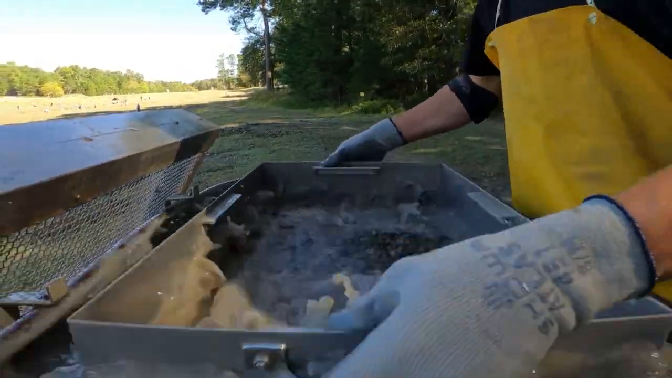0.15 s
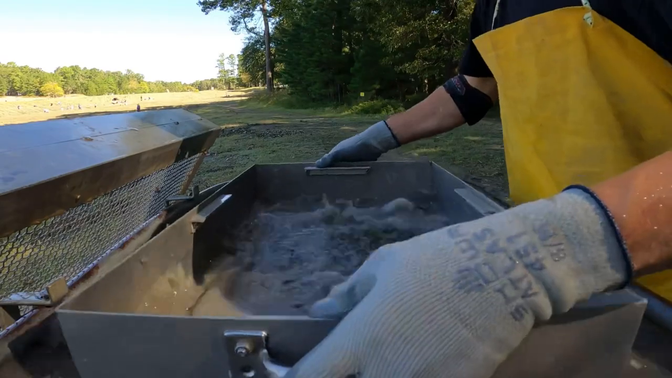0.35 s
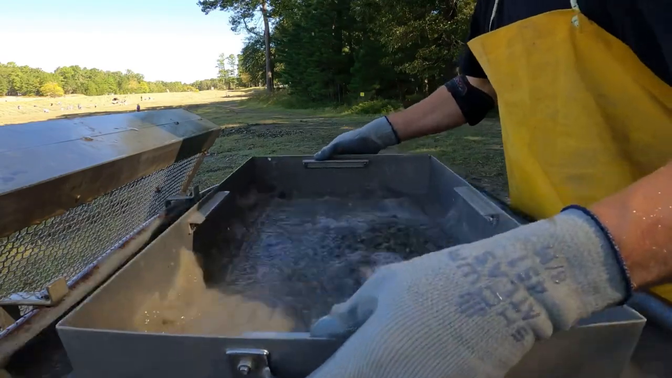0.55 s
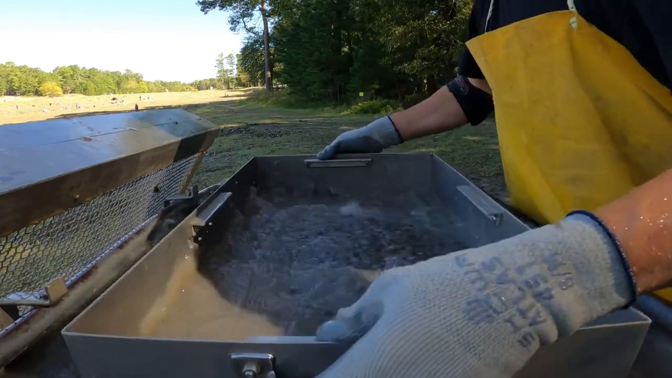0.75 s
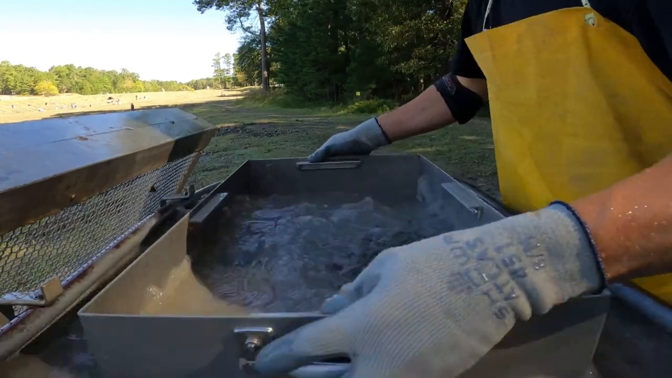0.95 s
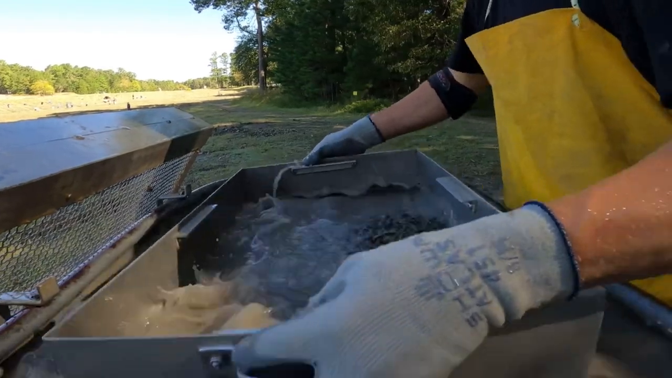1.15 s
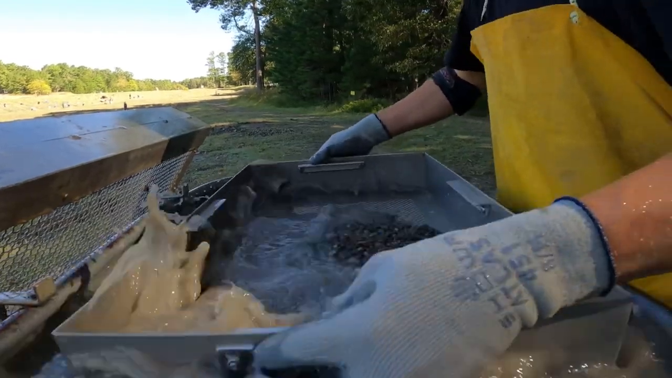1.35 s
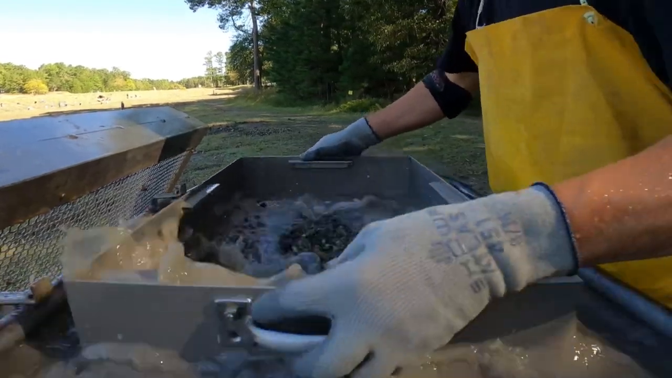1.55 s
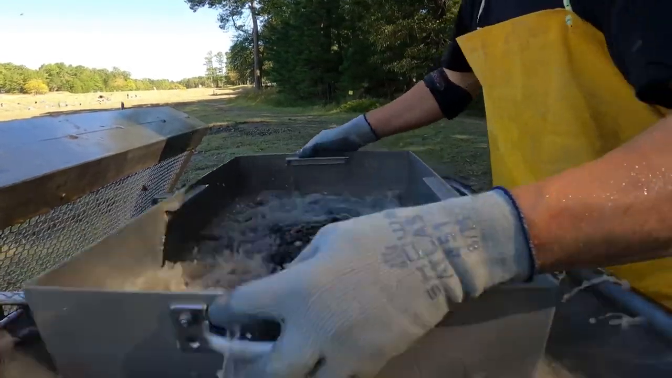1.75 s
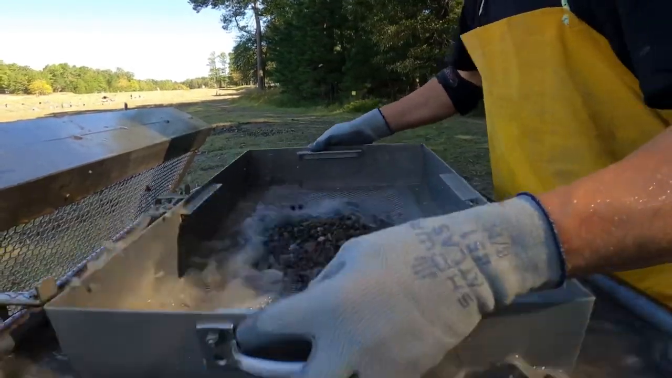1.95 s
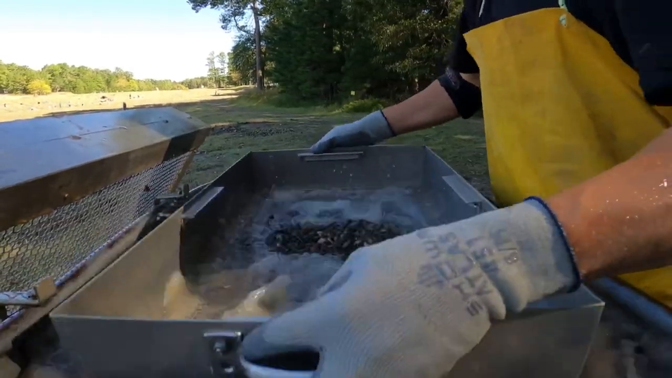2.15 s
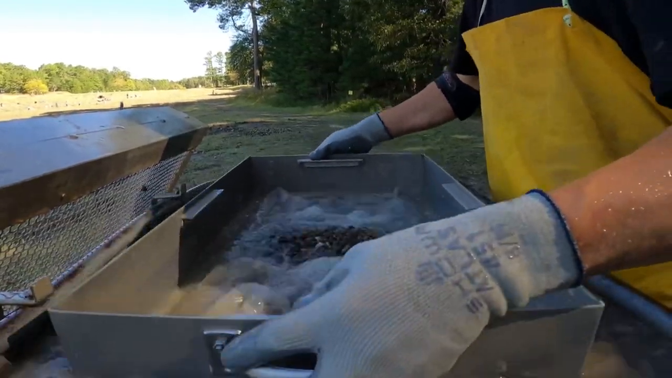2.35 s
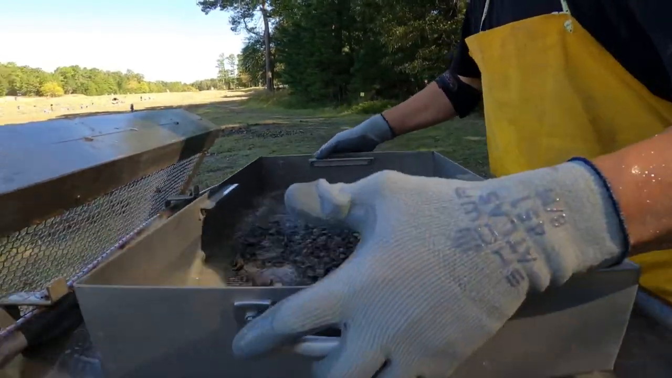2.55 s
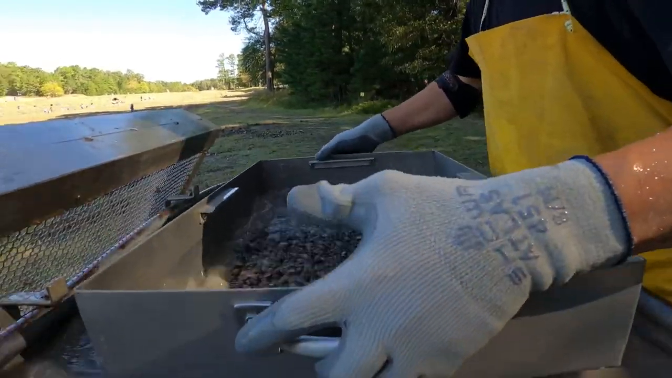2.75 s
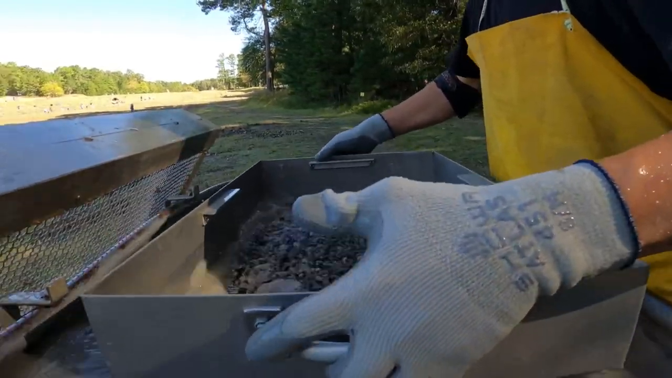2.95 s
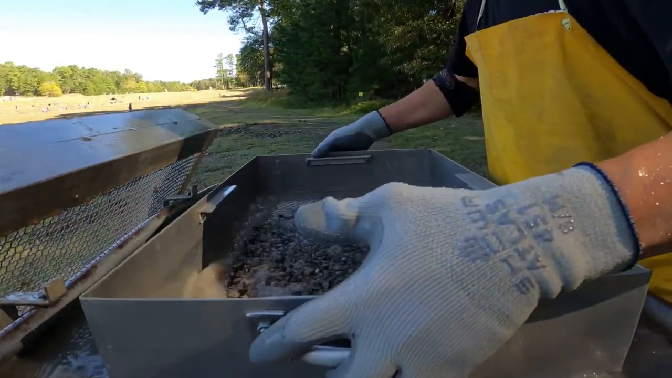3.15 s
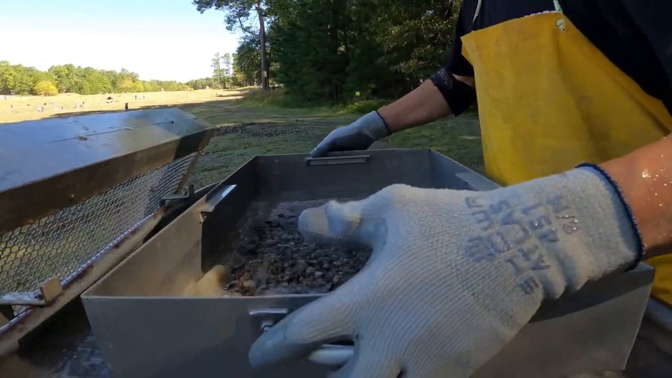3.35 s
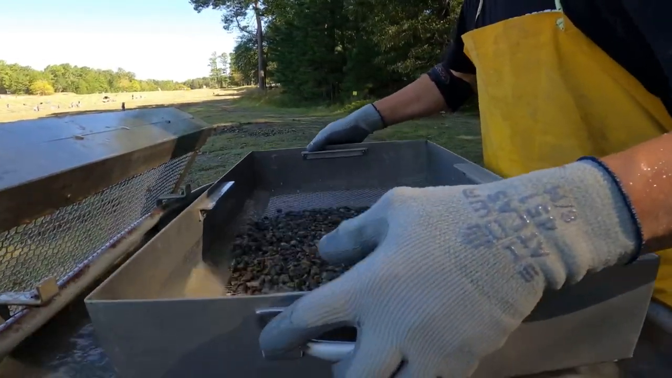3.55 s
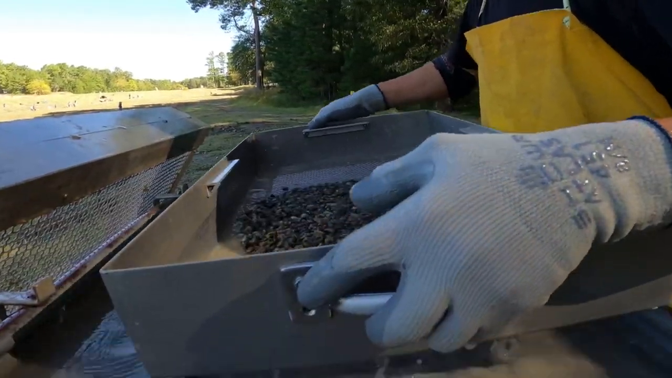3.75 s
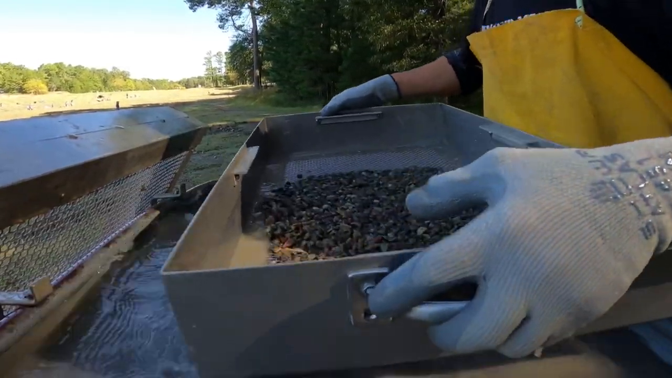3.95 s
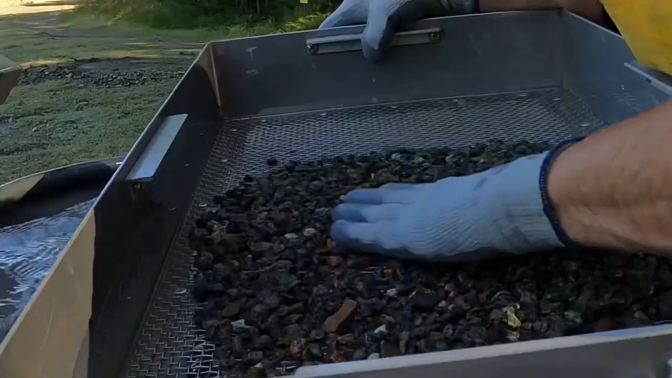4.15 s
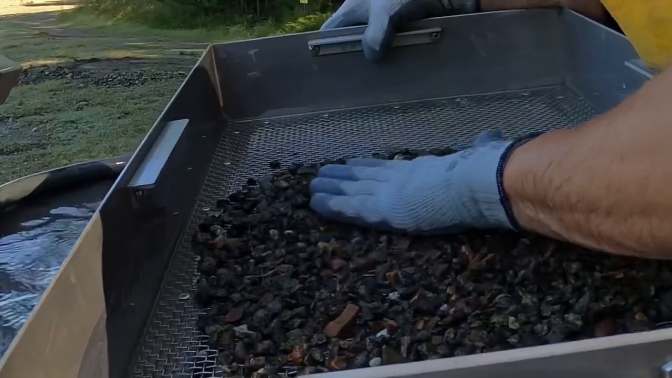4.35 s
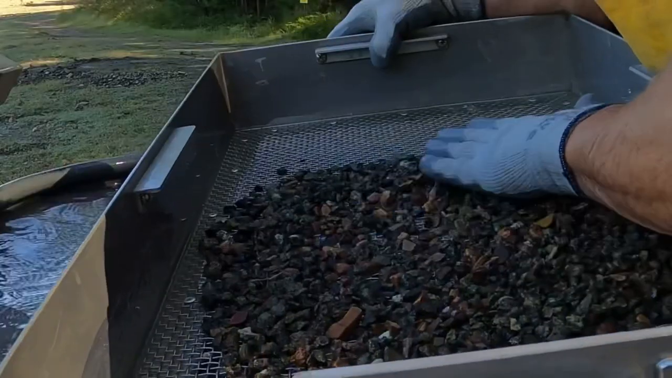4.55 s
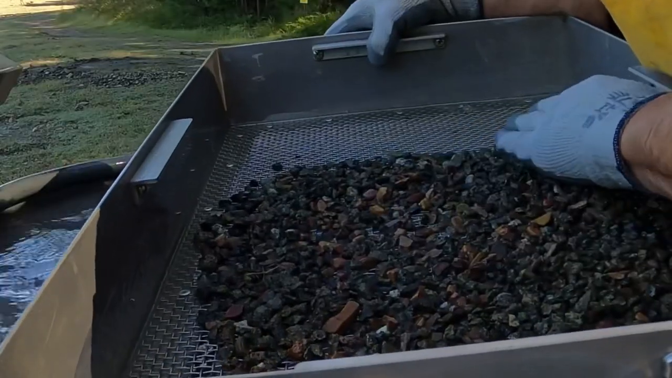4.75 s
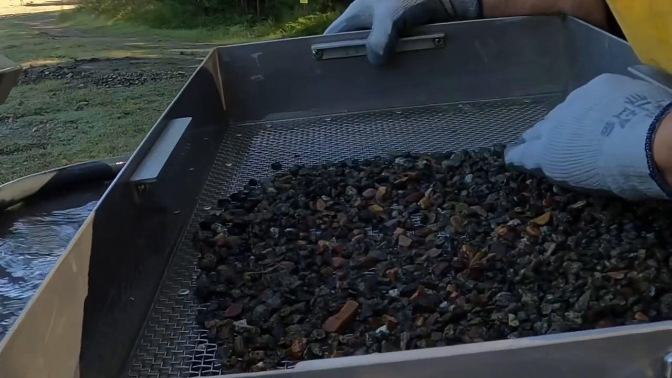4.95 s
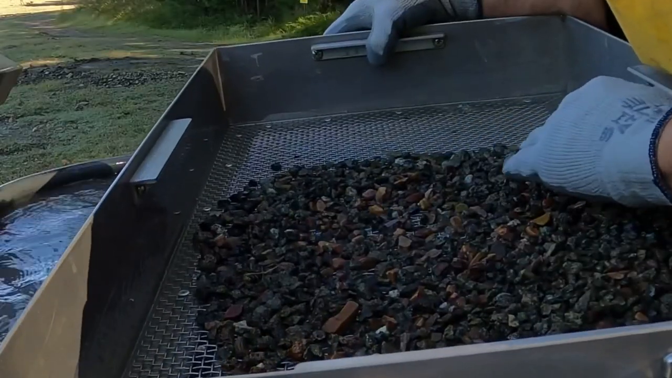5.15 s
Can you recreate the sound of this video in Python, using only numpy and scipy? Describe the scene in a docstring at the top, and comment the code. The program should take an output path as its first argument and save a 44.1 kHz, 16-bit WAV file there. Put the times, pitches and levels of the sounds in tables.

```python
"""Gravel is washed in a steel screen in a tub of water, outdoors and close by: random impacts ring steel modes.
Long rocking strokes swirl stones and bubbling water; quick shakes, each after a backswing, throw the bed across
the mesh, at best five times a second. Escaping air pockets gulp as gliding tones. The lifted screen drips (filtered
patter and decaying tones) and clinks once, then a gloved hand rakes the wet stones (gated clicks and knocks).
A far engine drones as a sum of shaft harmonics, over a low rumble of filtered noise."""
import sys
import numpy as np
from scipy import signal
from scipy.fft import rfft, irfft
from scipy.io import wavfile
from scipy.ndimage import uniform_filter1d

SR = 44100
rng = np.random.default_rng(int(sys.argv[2]) if len(sys.argv) > 2 else 0)


def output_pcm(signal):
    """Save a mono or channel-first signal as 16-bit PCM at the path in sys.argv[1].

    Samples are clipped to [-1, 1] before scaling.
    """
    pcm = np.clip(np.atleast_2d(signal).T, -1, 1) * 32767
    wavfile.write(sys.argv[1], SR, np.round(pcm).astype(np.int16))


N = 228879
T = np.arange(N) / SR  # time in s

# quick shakes: start_s, length_s (braking included), level_db, backswing_level_db
SHAKES = [(.443, 0.069, -17.5, -48), (0.66, 0.073, -17, -50), (2.418, 0.093, -19, -47),
          (2.664, .055, -18, -34.5), (2.872, 0.051, -18, -34.5), (3.071, 0.049, -18.5, -38.5),
          (3.26, 0.046, -18.5, -38), (3.44, 0.053, -18.5, -33)]
# spectrum of stones sliding over the mesh: frequency_hz, density_db
SLIDING_SPECTRUM = [(150, -62.5), (250, -15.5), (378, -21.5), (553, -14), (705, -5), (867, -10.5),
                    (1010, -0.5), (1140, -7.5), (1560, -3.5), (2490, -8), (3700, -5.5), (7640, -16),
                    (15500, -40)]
BACKSWING_LEAD_S, BACKSWING_S = 0.072, 0.033  # the backswing length includes its braking


def shaking(rise_s=0.0098, fall_s=.014, brake_s=0.0093, stumble_db=1.6):
    """Friction and inertia: a backswing shifts the bed a little, the shake breaks it loose, it rolls to rest."""
    throws = []
    swings = []
    for start, length, throw_db, swing_db in SHAKES:
        throws.append(stroke(start, length - brake_s, throw_db, rise_s, fall_s))
        swings.append(stroke(start - BACKSWING_LEAD_S, BACKSWING_S - brake_s, swing_db, rise_s, fall_s))
    uneven_swings = together(swings) * undb(stumble_db * walk(160))
    bed = rattle(SLIDING_SPECTRUM, rate=12000, spread_db=1, clump_db=0.0, ring_db=-6.5)
    return together([together(throws), uneven_swings]) * bed


# resonances of the steel screen: frequency_hz, bandwidth_hz, level_db
SCREEN_MODES = [(694, 74, 2), (966, 150, 0.5), (1550, 55, -3.5), (1710, 330, 0), (3130, 320, -3.5),
                (4260, 550, -12)]


def rattle(points, rate, spread_db, clump_db, modes=SCREEN_MODES, ring_db=0):
    """Impact excitation: stones collide in small avalanches, ping, and drive the resonances of the screen."""
    clumps = undb(clump_db * walk(130))
    voices = []
    for _ in range(2):  # mid and side
        ringing = pings(count=7000, low_hz=500, high_hz=14000, ring_s=.0025, spread_db=3)
        contacts = collisions(rate, spread_db) + undb(ring_db) * ringing
        avalanche = clumps * colour(contacts, points, modes)
        voices.append(unit(walls(avalanche)))
    return ports(*voices)


def collisions(rate, spread_db):
    """Shot noise: independent random contacts, rate a second, of either sign and varying force."""
    struck = rng.random(N) < rate / SR
    sign = rng.choice([-1, 1], N)
    force_db = spread_db * np.clip(rng.standard_normal(N), -2.5, 2.5)
    return unit(struck * sign * undb(force_db))


def pings(count, low_hz, high_hz, ring_s, spread_db):
    """Free vibration: each struck pebble rings at its own pitch and decays exponentially."""
    when, size, force = rng.random((count, 3)).T[:, :, None]
    age = np.arange(int(3 * ring_s * SR))  # samples
    hz = low_hz + (high_hz - low_hz) * size ** 2
    ring = np.sin(2 * np.pi * hz * age / SR) * np.exp(-age / (ring_s * SR))
    ring = ring * np.sqrt(size) * undb(-spread_db * np.log(force + 0.14))
    places = (when * N).astype(int) + age
    return unit(np.bincount(places.ravel(), ring.ravel(), N)[:N])


def walls(x, echo_db=-10, echo_s=0.0048):
    """Reverberation: sound bounces between the steel sides for a few milliseconds."""
    t = T[:SR // 30]
    tail = rng.standard_normal(len(t)) * np.exp(-t / echo_s)
    tail = tail * (t > .0015)  # the first reflections need time to return
    return x + undb(echo_db) * signal.fftconvolve(x, tail / np.linalg.norm(tail))[:N]


# long rocking strokes: start_s, length_s, rise_s, stones_level_db, water_level_db, swell_db_per_s
ROCKS = [(0, 0.049, .01, -19.5, -21, -19.5), (0.113, 0.18, 0.051, -22.5, -25, -9),
         (.872, 0.29, 0.015, -19.5, -21.5, -26), (1.175, 0.19, 0.05, -21, -24.5, 11.5),
         (1.482, .2, 0.077, -21, -22.5, 2), (1.75, 0.077, 0.029, -21.5, -23.5, -11.5),
         (1.874, 0.093, 0.042, -21, -26, -2), (2.065, 0.2, 0.031, -22.5, -24, -7)]
STONES_FALL_S, WATER_FALL_S = 0.049, 0.058
# water slopping against the tub between strokes: start_s, water_level_db
SLOPS = [(.4, -37.5), (.54, -36.5), (0.63, -35), (.762, -37.5), (.83, -36.5)]
SLOP_S, SLOP_RISE_S, SLOP_FALL_S = 0.01, .0025, 0.0091
# spectrum of wet stones colliding: frequency_hz, density_db
WET_STONES_SPECTRUM = [(300, -23), (700, -11), (1500, -2), (2500, -2), (4000, -3), (5500, -6.5),
                       (8000, -15), (11000, -25), (15500, -35.5)]
# spectrum of splashing and bubbling water: frequency_hz, density_db
WATER_SPECTRUM = [(120, -27.5), (250, -9), (350, -13.5), (500, -6), (700, -1), (1000, -0.5), (1500, -5),
                  (2200, -10), (4000, -36.5), (9000, -55)]


def swirling(splash_db=-4, bubble_db=-4, slop_stones_db=-4, surge_db=0.7):
    """Forced flow: each rocking stroke rolls the stones while water surges, splashes and bubbles among them."""
    stones = rattle(WET_STONES_SPECTRUM, rate=8000, spread_db=3.5, clump_db=0.5, ring_db=-7.5)
    splash = rattle(WATER_SPECTRUM, rate=3000, spread_db=5.5, clump_db=0.5, ring_db=-5.5)
    voices = []
    for _ in range(2):
        bubbling = bubbles(1500, 259.6, 2756, cycles=21.8, spread_db=1.5)
        voices.append(unit(colour(bubbling, WATER_SPECTRUM, SCREEN_MODES)))
    froth = ports(*voices)
    water = (undb(splash_db) * splash + undb(bubble_db) * froth) * undb(surge_db * walk(34.88))
    rolls = []
    flows = []
    for start, length, rise, stones_db, water_db, swell in ROCKS:
        rolls.append(stroke(start, length, stones_db, rise, STONES_FALL_S, swell))
        flows.append(stroke(start, length, water_db, rise, WATER_FALL_S, swell))
    slop = together([stroke(start, SLOP_S, db, SLOP_RISE_S, SLOP_FALL_S) for start, db in SLOPS])
    stones_gain = together([together(rolls), undb(slop_stones_db) * slop])
    water_gain = together([together(flows), slop])
    return stones_gain * stones + water_gain * water


def bubbles(count, low_hz, high_hz, cycles, spread_db, rise=0.27):
    """Bubble resonance: bubbles of all sizes ring briefly, rising in pitch as they near the surface."""
    out = np.zeros(N)
    for when, size, force in rng.random((count, 3)):
        hz = low_hz * (high_hz / low_hz) ** size
        age = np.arange(int(cycles / hz * SR)) * hz / cycles / SR  # 0 to 1 over the ring
        phase = 2 * np.pi * cycles * age * (1 + rise * age / 2)
        ring = np.sin(phase) * np.exp(-np.log(100) * age)
        add(out, when * N / SR, ring * hz * undb(-spread_db * np.log(force + 0.038)))
    return unit(out)


# air pockets that close under the screen: start_s, start_pitch_hz, end_pitch_hz, glide_s, level_db
GULPS = [(.002, 750, 1000, 0.0067, -18), (.044, 495, 700, 0.012, -15.5), (.313, 563, 950, .023, -16.5),
         (1.293, 240, 280, 0.032, -34.5), (1.7165, 490, 620, .009, -10.5), (1.769, 630, 1200, .042, -13),
         (2.016, 687, 720, 0.022, -23), (2.139, 372, 320, .036, -32), (2.27, 382, 312, .042, -37),
         (2.338, 416, 480, 0.021, -36.5)]


def gulps(rough=0.14):
    """Cavity resonance: large air pockets shrink as they escape, so their note sweeps up; deep ones may sag."""
    out = np.zeros(N)
    for start, start_hz, end_hz, glide_s, db in GULPS:
        age = np.arange(int(2 * glide_s * SR)) / (glide_s * SR)  # 1 at the end pitch
        hz = start_hz * (end_hz / start_hz) ** np.minimum(age, 1.3) ** 1.8  # glides on a little past it
        swell = np.minimum(age / .25, 1) * np.exp(-(age / .95) ** 4)
        add(out, start, undb(db) * swell * np.sin(2 * np.pi * np.cumsum(hz) / SR))
    return out * (1 + rough * walk(400))


# water runs through the mesh, thins once the screen is lifted, and pours again as it tips;
# the sound of the running water is cut off at 4 s
WET_DB, DRAINED_DB, LIFT_S, DRAIN_S = -43.5, -56.5, 3.47, 0.16
TIP_S, TIP_DB, TIP_RISE_S, CUT_OFF_S = 3.94, -51.5, .04, 4.0
# drops falling back into the tub, and one low clink of the screen at 3.963 s:
# start_s, level_db, pitch_hz, decay_cycles
DROPS_AND_CLINK = [(.379, -27, 1180, 11), (.398, -25, 2960, 11), (.791, -34, 1740, 11),
                   (2.326, -23.5, 1535, 11), (3.663, -33.5, 4510, 8.8), (3.799, -50, 1820, 11),
                   (3.871, -49, 1880, 11), (3.937, -38.5, 3330, 12), (3.963, -37, 940, 17),
                   (3.892, -44, 5190, 12), (3.987, -43, 6900, 16)]
# spectrum of the dripping: frequency_hz, density_db
DRIPPING_SPECTRUM = [(290, -53.5), (500, -3), (628, -8.5), (704, -5.5), (1880, -1), (2800, -3), (3140, -5),
                     (4670, -7.5), (15000, -33)]


def draining(fizz_db=-6, edge_s=0.0014, thinning_db_per_s=1):
    """Damped oscillation: over a dense patter of water, larger drops and one clink of the screen ring and decay."""
    patter = rattle(DRIPPING_SPECTRUM, rate=3000, spread_db=4.5, clump_db=2.0, modes=(), ring_db=-4.0)
    voices = []
    for _ in range(2):
        small_bubbles = bubbles(1100, 980, 10000, cycles=22, spread_db=5.0)
        voices.append(unit(colour(small_bubbles, DRIPPING_SPECTRUM)))
    fizz = ports(*voices)
    rings = np.zeros(N)
    t = T[:SR // 10]
    for start, db, hz, cycles in DROPS_AND_CLINK:
        decay = np.exp(-t * hz / cycles)
        add(rings, start, undb(db) * decay * np.sin(2 * np.pi * hz * t * (1 + t / 2)))  # pitch creeps up
    running = stroke(0, LIFT_S, WET_DB, edge_s, DRAIN_S, -thinning_db_per_s)
    tipping = stroke(TIP_S, CUT_OFF_S - TIP_S, TIP_DB, TIP_RISE_S, edge_s)
    flow = together([running, undb(DRAINED_DB), tipping])
    return (flow * (patter + undb(fizz_db) * fizz) + rings) * stroke(0, CUT_OFF_S, 0, edge_s, edge_s)


# the glove touches, pushes and lightly brushes the stones:
# start_s, length_s, rise_s, stones_level_db, mesh_level_db, swell_db_per_s (of the stones)
RAKES = [(4.05, 0.054, 0.019, -73.5, -69, 0), (4.15, .2, 0.017, -28.5, -41, 17.5),
         (4.393, 0.096, 0.024, -27.5, -33.5, -24), (4.938, 0.052, 0.065, -62, -66, -12)]
RAKE_FALL_S, RAKE_LIFT_S = 0.075, 0.14
PRESS_DB_PER_S = 25.5  # extra swell of the mesh: the hand sinks towards it as it goes
# single stones that snap against each other: start_s, level_db (before the common snap_db)
SNAPS = [(.3544, -25), (.5442, -21), (2.601, -21), (3.37, -18.5), (3.8357, -37), (3.8921, -35),
         (3.957, -36), (4.122, -23), (4.171, -15), (4.2688, -13), (4.6036, -30), (4.732, -41)]
# spectrum of drained stones clicking: frequency_hz, density_db
DRAINED_STONES_SPECTRUM = [(600, -13.5), (1800, -8), (3000, 1), (4500, -0.5), (6500, -5.5), (9000, -11),
                           (12000, -19), (15500, -28)]
# spectrum of knocks on the mesh: frequency_hz, density_db
MESH_SPECTRUM = [(120, -9), (280, -8.5), (380, -7.5), (700, -1), (1400, 0.5), (2000, -1), (3500, -28),
                 (9000, -49)]
# the screen out of the water rings more freely: frequency_hz, bandwidth_hz, level_db
DRY_SCREEN_MODES = [(725, 53, 2.5), (1000, 130, 2), (1460, 150, 3), (1780, 120, 1), (2670, 130, 4),
                    (3150, 180, 0.5), (3470, 120, -0.5), (4300, 230, 1.5), (5430, 250, -2)]
# spectrum of the lifted screen rumbling in the hands: frequency_hz, density_db
HANDLING_SPECTRUM = [(40, -22.5), (65, -5), (88, 5), (125, -3.5), (170, -15.5), (400, -34.5), (2000, -79.5)]
HANDLING_S, HANDLING_HOLD_S, HANDLING_RISE_S, HANDLING_FALL_S, HANDLING_DB = 4.04, 0.21, .13, 0.27, -45.5


def spreading(snap_db=-10, snap_s=0.0029, catch_db=1, rest_db=-82, settle_s=4.66, settle_db=-66, settle_fall_s=.1):
    """Stick and slip: the glove rakes drained stones unevenly, bright clicks above, duller mesh knocks below."""
    clicks = rattle(DRAINED_STONES_SPECTRUM, rate=4000, spread_db=2, clump_db=0.85,
                    modes=DRY_SCREEN_MODES, ring_db=-5)
    knocks = rattle(MESH_SPECTRUM, rate=1500, spread_db=3, clump_db=0.5, modes=DRY_SCREEN_MODES, ring_db=-2.5)
    force = undb(rest_db) + stroke(settle_s, 0, settle_db, RAKE_FALL_S, settle_fall_s)
    press = 0
    for start, length, rise, stones_db, mesh_db, swell in RAKES:
        lifting = np.maximum(T - start - length, 0) / RAKE_LIFT_S
        grip = (T > start - 2 * rise) * np.exp(-lifting ** 2) * undb(catch_db * walk(30))
        force = force + grip * stroke(start, length, stones_db, rise, RAKE_FALL_S, swell)
        press = press + grip * stroke(start, length, mesh_db, rise, RAKE_FALL_S, swell + PRESS_DB_PER_S)
    for start, db in SNAPS:  # a snap briefly opens the clicks
        add(force, start, undb(db + snap_db) * np.exp(-T[:SR // 20] / snap_s))
    carry = stroke(HANDLING_S, HANDLING_HOLD_S, HANDLING_DB, HANDLING_RISE_S, HANDLING_FALL_S)
    rumble = unit(colour(rng.standard_normal(N), HANDLING_SPECTRUM))
    return force * clicks + press * knocks + carry * rumble


# distant engine: time_s, shaft_rate_hz, level_db (before engine_db)
ENGINE = [(0, 25.02, -52), (2.3, 26, -64), (2.6, 30.1, -49), (3.2, 30.22, -51), (3.9, 29.13, -49.5),
          (4.15, 27, -53), (4.7, 23.45, -52.5), (5.19, 23.7, -53.5)]
# its harmonic lines: multiple_of_shaft_rate, relative_level_db
ENGINE_ORDERS = [(1.5, -0.5), (3, -5), (4, -16.5), (5, -8.5), (6, -4.5), (7, -6), (9, -15.5)]
# spectrum of the low outdoor rumble: frequency_hz, density_db
AIR_SPECTRUM = [(13, -30), (22, -0.5), (52, 1), (135, -6), (272, -12.5), (537, -18.5), (935, -30.5),
                (1030, -25), (1940, -37), (2090, -37), (5440, -43), (6650, -50), (9000, -57), (11700, -89),
                (19800, -120)]


def outdoors(engine_db=-1, air_db=-53):
    """Harmonic series and broadband noise: a far engine, wavering in the air, over a low rumble."""
    shaft_hz = curve(ENGINE) * (1 + .012 * walk(14))
    turns = np.cumsum(shaft_hz) / SR
    lines = [undb(db + 2.5 * walk(12)) * np.sin(2 * np.pi * order * turns) for order, db in ENGINE_ORDERS]
    drone = unit(sum(lines))
    rumble = ports(*(unit(colour(rng.standard_normal(N), AIR_SPECTRUM)) for _ in range(2)))
    return drone * undb(curve(ENGINE, axis=2) + engine_db) + rumble * undb(air_db + 1.2 * walk(9))


def stroke(s, length, db, rise_s, fall_s, swell=0):
    """Envelope of one movement: it builds up to time s, holds while swelling in dB per s, then dies away."""
    before = np.maximum(s - T, 0) / rise_s
    after = np.maximum(T - s - length, 0) / fall_s
    held = undb(db + swell * np.clip(T - s, 0, length))
    return held * np.exp(-np.minimum(before + after, 20))


def together(gains):
    """Incoherent summation: overlapping movements add in power."""
    return np.sqrt(sum(gain ** 2 for gain in gains))


def walk(rate):
    """Slow fluctuation: random levels held 1 / rate s and smoothed twice; spread near 1."""
    hold = int(SR / rate)
    steps = np.repeat(rng.standard_normal(N // hold + 1), hold)
    return 1.11 * uniform_filter1d(uniform_filter1d(steps, hold), hold)[:N]


def colour(x, points, modes=()):
    """Minimum-phase filtering: a causal filter from a spectrum, with resonances standing out of it."""
    size = 4096
    hz = np.arange(size // 2 + 1) * SR / size + 1  # + 1 keeps the logarithm finite
    at, db = np.transpose(points)
    gain = undb(np.interp(np.log(hz), np.log(at), db))
    peaks = sum(undb(d) ** 2 / (1 + (2 * (hz - f) / w) ** 2) for f, w, d in modes)
    gain = gain * np.sqrt(1 + peaks)
    cepstrum = irfft(np.log(gain))
    cepstrum[1:size // 2] *= 2  # folding the cepstrum makes the filter causal
    cepstrum[size // 2 + 1:] = 0
    return signal.fftconvolve(x, irfft(np.exp(rfft(cepstrum))))[:N]


def undb(db):
    """Logarithmic level: decibels to amplitude gain."""
    return 10 ** (np.asarray(db) / 20)


def unit(x):
    """Effective value: scale to rms 1."""
    return x / np.sqrt(np.mean(x ** 2))


def curve(rows, axis=1):
    """Linear interpolation: one column of a table, joined by straight lines in time."""
    rows = np.array(rows)
    return np.interp(T, rows[:, 0], rows[:, axis])


def add(out, s, sound):
    """Superposition: mix a short sound in at time s."""
    i = int(np.clip(s * SR, 0, N - 1))
    out[i:i + len(sound)] += sound[:N - i]


# difference between the two microphone ports: frequency_hz, side_minus_mid_db
WIDTH = [(60, -12.5), (250, -8.5), (600, -12), (1300, -16), (2400, -9), (4400, -9), (8000, -4), (12000, -2),
         (15000, -2)]


def ports(mid, side):
    """Spatial coherence: the ports share mid and oppose side; the left one hears one sample later."""
    side = colour(side, WIDTH)
    return np.array([np.roll(mid + side, shift=1), mid - side])


def scene():
    """Superposition of all sources at the two ports."""
    return shaking() + swirling() + gulps() + draining() + spreading() + outdoors()


# balance of the ports: frequency_hz, left_minus_right_db
LEAN = [(4000, 0), (6800, 0.5), (8200, -2), (9800, -.5), (11500, -0.5), (12500, -2.5), (15000, -4)]
# the level dips briefly: start_s, recovered_s, depth_db
DIP = (2.439, 2.458, -17.5)
# the image starts almost mono, the treble less so, and widens until it opens fully; the very top is always wide
OPEN_S, NARROW_DB, WIDEN_DB_PER_S = 2.43, -37, 8
TREBLE_OPEN_S, NARROW_TREBLE_DB, HALF_OPEN_DB = 1.24, -25.5, -5.5
TOP_HZ = 15650


def record(dry):
    """Mid-side processing: the ports differ in treble, the image opens, the level dips, the top is cut steeply."""
    left = colour(dry[0], [(hz, db / 2) for hz, db in LEAN])
    right = colour(dry[1], [(hz, -db / 2) for hz, db in LEAN])
    mid, side = (left + right) / 2, (left - right) / 2
    above_6k, top = (signal.sosfiltfilt(signal.butter(8, hz, "high", fs=SR, output="sos"), side)
                     for hz in (6000, 11600))
    low, treble = side - above_6k, above_6k - top
    narrow = T < OPEN_S
    low_gain = undb(narrow * (NARROW_DB + WIDEN_DB_PER_S * T))
    treble_gain = undb(narrow * np.where(T < TREBLE_OPEN_S, NARROW_TREBLE_DB, HALF_OPEN_DB))
    side = top + low * low_gain + treble * treble_gain
    start, end, depth_db = DIP
    recovery = np.clip((T - start) / (end - start), 0, 1)
    dip = undb(depth_db * (T > start) * (1 - recovery ** 2))
    steep_cut = signal.ellip(10, .2, 80, TOP_HZ, fs=SR, output="sos")
    return signal.sosfilt(steep_cut, dip * np.array([mid + side, mid - side]))


dry = scene()
out = record(dry)
output_pcm(out)
```